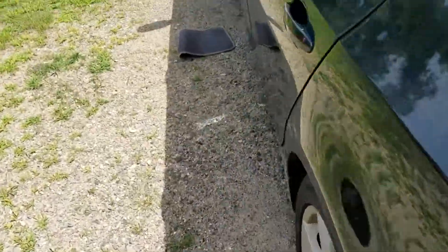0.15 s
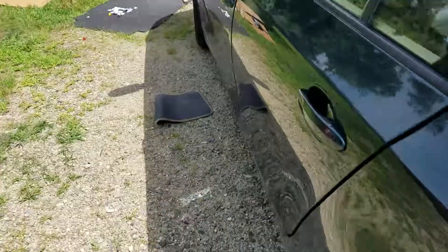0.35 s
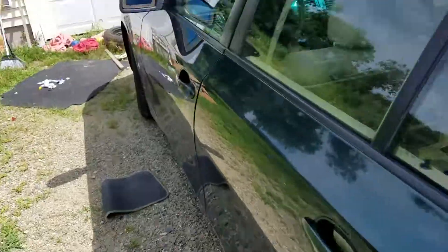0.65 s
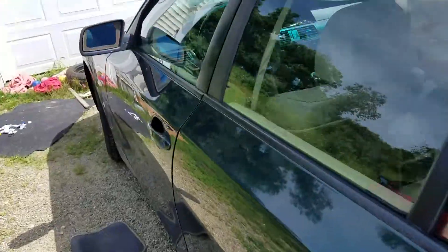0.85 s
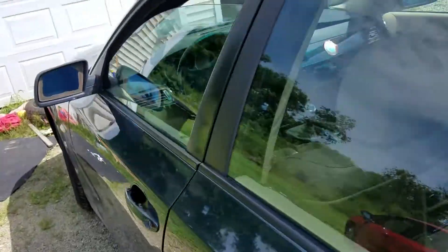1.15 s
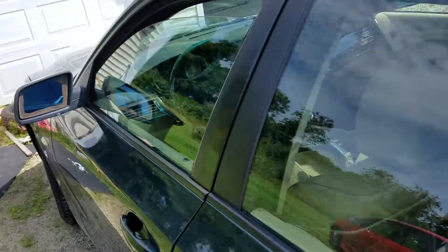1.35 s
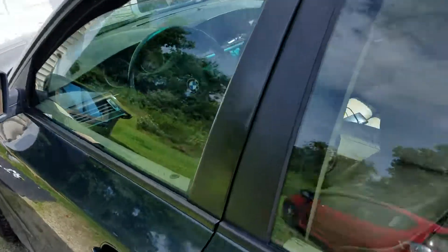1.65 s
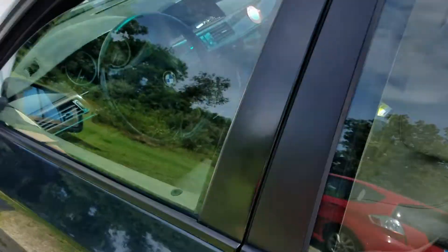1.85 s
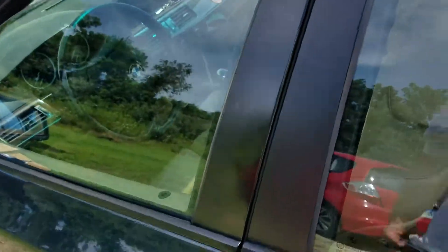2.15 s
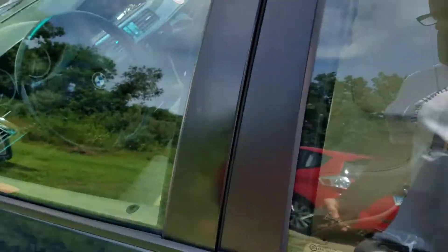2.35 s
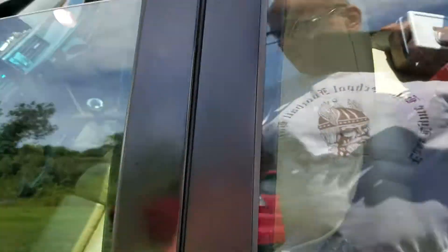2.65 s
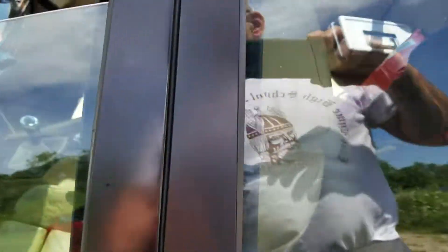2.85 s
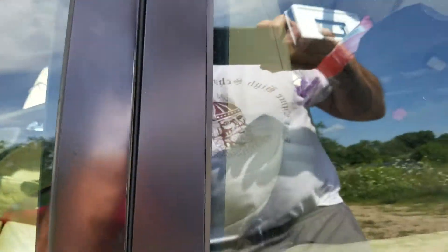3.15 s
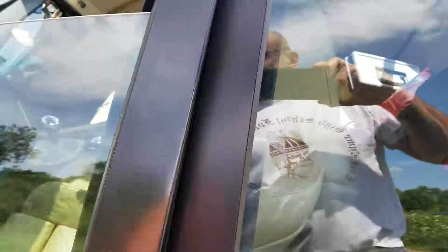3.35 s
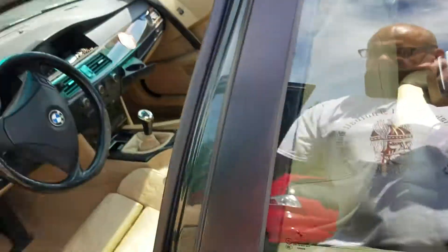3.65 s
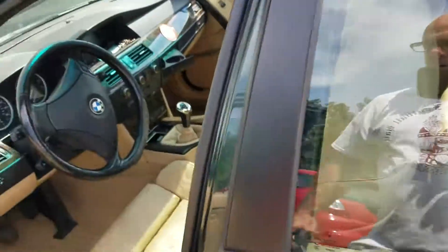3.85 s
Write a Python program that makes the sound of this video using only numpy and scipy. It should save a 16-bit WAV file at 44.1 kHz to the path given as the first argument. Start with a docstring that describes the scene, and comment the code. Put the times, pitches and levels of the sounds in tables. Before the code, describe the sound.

Footsteps crunch unevenly on loose gravel while keys jingle close by, then a car door opens.

```python
"""Footsteps on loose gravel near a parked car: swells of random impacts grind, single damped pulses snap.
Keys jingle close by as impacts exciting high modes, with mode-cluster clinks, squeaks and rubbing cloth.
The handle clunks and the door peels off its seal: band-passed impacts thump, a ringing run of slips rasps.
An insect trills on a pulsed tone and a small bird calls in falling glides over a quiet yard of filtered
noise; a low rumble of noise and wavering tones sinks to a faint hum within the first second."""
import sys
import numpy as np
from scipy import signal
from scipy.fft import rfft, irfft
from scipy.io import wavfile

SR = 44100
rng = np.random.default_rng(int(sys.argv[2]) if len(sys.argv) > 2 else 0)


def pcm_store(signal):
    """Save signal as 16-bit PCM."""
    levels = np.round(np.clip(np.atleast_2d(signal), -1, 1) * 32767)
    wavfile.write(sys.argv[1], SR, levels.astype(np.int16).T)


N = 176400
T = np.arange(N) / SR


def from_db(db):
    """Amplitude gain as the antilogarithm of a level in decibels."""
    return 10 ** (np.asarray(db) / 20)


def rms_one(x):
    """Normalization of mean power: scale to unit rms."""
    return x / np.sqrt(np.mean(x ** 2) + 1e-20)


def panned(db):
    """Interaural level difference: left and right gains, db being left over right."""
    return rms_one(from_db(np.array([[db], [-db]]) / 2))


def lag_at(s):
    """Interaural time difference: left delay in seconds, as sounds come from different sides over time."""
    # arrival lag of the left side behind the right: t/s, lag/s
    lag_curve = [(.25, .00013), (2.3, .00023), (3.2, .0001), (3.6, -.00028)]
    return np.interp(s, *np.transpose(lag_curve))


def coloured(x, points):
    """Minimum-phase (causal) filter with the given spectrum, built from its cepstrum; rms 1."""
    size = 2 ** 18
    hz, db = np.transpose(points)
    bins_hz = np.arange(size // 2 + 1) * SR / size
    gain = from_db(np.interp(np.log(bins_hz + 1), np.log(hz), db))
    cepstrum = irfft(np.log(gain))[:size // 2]
    response = np.exp(2 * rfft(cepstrum, size))
    return rms_one(irfft(rfft(x, size) * response)[..., :N])


def band(x, hz, width):
    """Broad resonance as a band-pass from hz / width to hz * width."""
    width = max(width, 1.05)
    edges = [hz / width, min(hz * width, .45 * SR)]
    return signal.sosfilt(signal.butter(2, edges, "band", fs=SR, output="sos"), x + 1e-18)


def swell(s, rise, fall, db):
    """Exponential growth and decay: 20 dB up over the rise, 20 dB down over the fall."""
    return from_db(db - 20 * np.minimum(np.maximum((s - T) / rise, (T - s) / fall), 10))


def swells(rows):
    """Joint level of several swells by addition of their powers."""
    return np.sqrt(sum(swell(*row) ** 2 for row in rows))


def add(out, s, x):
    """Linear superposition of a short sound at time s."""
    i = max(int(s * SR), 0)
    out[..., i:i + x.shape[-1]] += x[..., :max(N - i, 0)]


def wander(per_s):
    """Random modulation: a slow swing of about one unit between per_s random points a second."""
    return np.interp(T * per_s, np.arange(N), rng.standard_normal(N))


def uneven(per_s, spread_db):
    """Random amplitude modulation, as in stick and slip: a gain moving between random levels; rms 1."""
    levels = np.clip(rng.standard_normal(4000), -1.8, 1.8)
    return rms_one(from_db(spread_db * np.interp(T * per_s, np.arange(4000), levels)))


def contacts(per_s, spread_db):
    """Shot noise: random tiny impacts of uneven size, each with its own interaural lag."""
    lag_spread_s = .00009
    at = np.flatnonzero(rng.random(N) < per_s / SR)
    level_db = spread_db * np.minimum(rng.exponential(1, N), 3.5)
    size = (from_db(level_db) * rng.choice([-1, 1], N))[at]
    lag = ((lag_at(at / SR) + lag_spread_s * rng.standard_normal(N)[at]) * SR).astype(int)
    out = np.zeros((2, N))
    out[0, np.clip(at + lag, 0, N - 1)] = size
    out[1, at] = size
    return out


def grains(per_s, spread_db, low_hz, high_hz, width, count=10):
    """Impact excitation of small bodies of different pitch; roughly flat in spectrum."""
    pitches = np.geomspace(low_hz, high_hz, count)
    return rms_one(sum(band(contacts(per_s / count, spread_db), hz, width) for hz in pitches))


def ringing(x, low_hz, high_hz, t60, ring_db, count=40):
    """Modal response: impacts convolved with the close decaying modes of the body that they strike."""
    t = T[:SR // 8]
    modes = low_hz + (high_hz - low_hz) * (np.arange(count) + rng.random(count))[:, None] / count
    body = np.sin(2 * np.pi * (modes * t + rng.random((count, 1)))).sum(axis=0) * from_db(-60 * t / t60)
    rung = signal.fftconvolve(x, body[None] / np.linalg.norm(body), axes=1)[:, :N]
    return rms_one(x + from_db(ring_db) * rung)


def air(points, alike_hz):
    """Diffuse-field coherence: stereo noise whose sides are alike only in the bass."""
    shared, own = rng.standard_normal(N), rng.standard_normal((2, N))
    low = signal.butter(1, alike_hz, "low", fs=SR)
    high = signal.butter(1, alike_hz, "high", fs=SR)
    return coloured(signal.lfilter(*low, shared) + signal.lfilter(*high, own), points)


def rumble():
    """Low-passed noise plus frequency-modulated tones, sinking together to a faint hum."""
    # spectrum of the noise: f/Hz, relative level per hertz/dB
    rumble_colour = [(20, -35), (55, 10), (120, 1.5), (220, -1.5), (600, -61.5)]
    # course of the gain on noise and tones: t/s, gain/dB
    rumble_course = [(0, -45.5), (.2, -42.5), (.32, -39), (.73, -41), (.8, -51.5), (2.1, -63.5), (4, -59.5)]
    # steady tones: f/Hz, gain before the course/dB
    hum_lines = [(113, -2.5), (152, -6.5), (226, -13)]
    waver_hz = 3
    drone = 0
    for hz, db in hum_lines:
        gain = from_db(db) * uneven(per_s=31, spread_db=2.5)
        cycles = np.cumsum(hz + waver_hz * wander(per_s=25)) / SR
        drone = drone + gain * np.sin(2 * np.pi * cycles)
    noise = air(rumble_colour, alike_hz=88) * from_db(-4.5)
    return (noise + drone) * from_db(np.interp(T, *np.transpose(rumble_course)))


def yard():
    """Broadband ambient noise: open-air hiss, a light breeze and a rumble, with one soft low bump."""
    # spectrum of the hiss: f/Hz, relative level per hertz/dB
    yard_colour = [(25, -7.5), (60, -3.5), (130, 5.5), (450, 3.5), (800, -3), (1400, -3.5), (2200, -1),
                   (3200, -9.5), (5000, -11.5), (7200, -11), (8400, -7.5), (10000, -13.5), (16000, -21.5)]
    hiss_db, breeze_db, breeze_hz, bump_hz = -48.5, -69.5, 42, 115
    hiss = from_db(hiss_db) * air(yard_colour, alike_hz=670)
    breeze = from_db(breeze_db) * rms_one(band(rng.standard_normal((2, N)), breeze_hz, 1.9))
    bump = swell(s=.72, rise=.47, fall=.14, db=-37) * np.sin(2 * np.pi * bump_hz * T)
    return (hiss + rumble() + bump + breeze) * panned(db=-1.5)


def flutter():
    """Narrow-band random modulation: low-passed noise, independent on each side; rms 1."""
    lowpass = signal.butter(2, 190, fs=SR, output="sos")
    return rms_one(signal.sosfilt(lowpass, rng.standard_normal((2, N))))


def insect():
    """Pulsed amplitude and frequency modulation: a trill whose every pulse sags in pitch."""
    mid_hz, sag_hz, pulses_per_s, trill_db = 8250, 303, 19, -58
    cycle = np.cumsum(pulses_per_s * (1 + .15 * wander(per_s=15))) / SR % 1
    tone = np.sin(2 * np.pi * np.cumsum(mid_hz - sag_hz * (cycle - .5)) / SR)
    return from_db(trill_db) * rms_one(tone * (.6 + flutter()) * np.sin(np.pi * cycle))


def bird():
    """Frequency glides: a small bird's falling whistles, each doubled by a fainter second voice just behind."""
    # notes: onset t/s, length/s, start f/Hz, end f/Hz, peak level before flutter/dB
    bird_notes = [(2.735, .04, 4000, 3200, -55), (3.35, .065, 4450, 3900, -59),
                  (3.472, .055, 4000, 2900, -54), (3.69, .045, 3900, 3100, -55),
                  (3.81, .05, 4200, 3000, -53)]
    second_voice_s, second_voice_db = .018, -8
    out = np.zeros(N)
    for s, length, start_hz, end_hz, db in bird_notes:
        u = np.linspace(0, 1, int(length * SR))
        glide = np.sin(2 * np.pi * np.cumsum(start_hz + (end_hz - start_hz) * u) / SR)
        note = from_db(db) * np.sin(np.pi * u) * glide
        add(out, s, note)
        add(out, s + second_voice_s, from_db(second_voice_db) * note)
    return out * (1 + .5 * flutter())


def door():
    """Impact and stick-slip: handle and hinge thump the panel; latch and seal let go in small slips."""
    # latch and rubber seal rasping: peak t/s, rise/s, fall/s, level before panning/dB
    rasp_swells = [(3.018, 0.01, 0.059, -30), (3.143, 0.014, 0.026, -27.5), (3.172, 0.031, 0.082, -22.5),
                   (3.223, 0.014, 0.013, -24.5), (3.255, 0.018, 0.027, -28.5), (3.606, 0.025, 0.044, -26.5)]
    # spectrum of the rasp: f/Hz, relative level per hertz/dB
    seal_colour = [(40, -3), (150, -7), (600, 0.5), (900, -4), (1700, 2), (2350, -4.5), (3100, -14.5),
                   (6000, -19), (16000, -28.5)]
    # the door's body thumping: peak t/s, rise/s, fall/s, level/dB, f/Hz
    thump_rows = [(2.834, 0.023, 0.019, -32, 395), (2.854, 0.028, 0.026, -34, 164),
                  (3.02, 0.0063, 0.03, -28.5, 454), (3.036, 0.022, 0.073, -38, 197),
                  (3.173, 0.012, 0.041, -20, 297), (3.262, 0.0087, 0.04, -28.5, 510),
                  (3.607, 0.035, 0.052, -27, 440), (3.613, 0.019, 0.087, -30.5, 163),
                  (3.915, 0.011, 0.046, -38, 340)]
    slips = contacts(per_s=2800, spread_db=3.5)
    rasp = ringing(slips, low_hz=297, high_hz=2540, t60=0.032, ring_db=-16.5, count=12)
    out = coloured(rasp, seal_colour) * swells(rasp_swells) * panned(db=-4.5)
    for s, rise, fall, db, hz in thump_rows:
        level = swell(s, rise, fall, db)
        thump = band(contacts(per_s=2100, spread_db=3.0), hz, 1.42) * level
        out += rms_one(thump) * np.sqrt(np.mean(level ** 2))
    return out


def cloth():
    """Friction as shot noise: cloth rustles as a hand rummages for the keys."""
    # rummaging: peak t/s, rise/s, fall/s, level before panning/dB
    rummage_swells = [(1.23, 0.012, 0.14, -30.5), (1.275, 0.036, 0.047, -34.5), (1.992, 0.03, 0.06, -27.5),
                      (2.396, 0.0086, 0.022, -29), (2.47, 0.11, 0.041, -36)]
    # spectrum of the cloth: f/Hz, relative level per hertz/dB
    cloth_colour = [(100, -29), (230, -28), (340, 1.5), (440, 1.5), (700, -3), (1000, -9.5), (2000, -6.5),
                    (5000, -31.5)]
    rustle = coloured(contacts(per_s=1100, spread_db=4), cloth_colour)
    return rustle * swells(rummage_swells) * panned(db=-0.5)


def squeaks():
    """Phase diffusion broadens a line: a rubbed key squeaks on one of its modes."""
    # squeaks: peak t/s, rise/s, fall/s, level before panning/dB, f/Hz
    squeak_rows = [(0.924, .006, 0.022, -26, 10000), (1.33, 0.0064, 0.011, -26.5, 10250),
                   (2.412, 0.02, 0.019, -24.5, 12750), (2.41, 0.032, 0.13, -29.5, 8740),
                   (2.42, 0.038, 0.05, -32, 7350), (2.42, 0.036, 0.028, -36.5, 7430),
                   (2.552, .02, .022, -26, 14800), (2.588, .02, 0.037, -25, 15300)]
    width_hz = 55
    out = np.zeros((2, N))
    for s, rise, fall, db, hz in squeak_rows:
        steps = rng.standard_normal((2, N))
        phase = np.cumsum(steps, axis=1) * np.sqrt(2 * np.pi * width_hz / SR)
        out += np.sqrt(2) * swell(s, rise, fall, db) * np.sin(2 * np.pi * hz * T + phase)
    return out


def keys():
    """Modal excitation by sliding contact: the keys slide, catch on their teeth and squeak."""
    # keys sliding over each other: peak t/s, rise/s, fall/s, level before panning/dB
    jingle_swells = [(.26, .08, 0.16, -39), (.84, 0.02, 0.025, -37), (.945, 0.019, 0.018, -30.5),
                     (1.287, 0.16, 0.047, -31.5), (1.42, 0.2, 0.28, -37), (1.56, 0.057, 0.064, -34),
                     (1.8, 0.045, 0.29, -39.5), (1.98, 0.086, 0.1, -32.5), (2.15, 0.059, 0.18, -36.5),
                     (2.255, 0.055, 0.046, -32), (2.41, 0.062, 0.16, -38), (2.505, 0.023, 0.024, -24),
                     (2.557, 0.062, 0.042, -26), (2.587, 0.024, 0.078, -28.5), (2.68, 0.037, 0.062, -37.5),
                     (3.05, 0.081, 0.2, -44), (3.76, 0.36, 0.2, -46)]
    # spectrum of the sliding: f/Hz, relative level per hertz/dB
    key_colour = [(1000, -35), (3000, -12), (4500, -8.5), (6200, -12.5), (7400, -11), (8700, 3),
                  (10000, -6), (12600, -4.5), (13600, -9.5), (15200, -5), (16500, -33)]
    # key teeth catching on each other: peak t/s, rise/s, fall/s, level before panning/dB
    scrape_swells = [(2.5, .035, 0.035, -40), (2.555, .035, 0.12, -38)]
    slide = ringing(contacts(per_s=5000, spread_db=3.5), low_hz=5570, high_hz=15500, t60=0.068, ring_db=-32.0)
    jingle = coloured(slide, key_colour) * swells(jingle_swells) * uneven(per_s=210, spread_db=5.5)
    catches = band(contacts(per_s=700, spread_db=4.5), hz=5300, width=2.1)
    teeth = rms_one(catches) * swells(scrape_swells)
    return (jingle + squeaks() + teeth) * panned(db=-2.0)


def clinks(count=60):
    """Damped modal cluster: metal scrapes into metal, mostly damped at once by the hand."""
    # sharp clinks: t before the delay/s, level before level_db/dB, f of the strongest modes/Hz,
    # left over right/dB
    clink_rows = [(0.0835, -27, 6500, -8), (0.2582, -20, 6100, -3), (0.9064, -9, 9100, -1),
                  (0.9195, -16, 9700, 9), (1.276, -19, 8700, -5), (1.299, -15.5, 6300, -3),
                  (1.3623, -21, 9100, -2), (1.478, -20, 8500, -3), (1.554, -17.5, 12100, -1),
                  (1.763, -22, 10900, -2), (1.8336, -21, 7550, -6), (1.962, -18, 9300, -2),
                  (2.0307, -20.5, 8400, 1), (2.0986, -20, 10300, -3), (2.3273, -22, 8250, -5),
                  (2.3573, -18.5, 9500, -2), (2.3877, -22.5, 12300, -3), (2.471, -18, 8800, -1),
                  (2.489, -16, 12100, -2), (2.5045, -28, 13500, -1.5), (2.5384, -15, 14600, 8),
                  (2.559, -16, 8790, -3), (2.579, -12, 13000, 0), (2.6452, -19, 11700, -4),
                  (2.6587, -20, 15000, -0.5), (2.6678, -10.5, 12800, -4.0), (2.678, -28, 12000, -2),
                  (2.86, -25, 12300, -3), (3.014, -15, 8600, 2), (3.034, -26, 14000, -3),
                  (3.6013, -25, 8400, 1), (3.6302, -23, 7030, 2), (3.7647, -24.5, 7300, 2)]
    delay_s, lead_s, rise_s, level_db = .0022, .006, .002, -8.5
    t60_s, ring_db, ring_s, octaves = .016, -12.5, .077, .43
    tick_db, tick_hz = -12, 2400  # the dull contact under each clink
    out, t = np.zeros((2, N)), T[:SR // 12]
    before, after = np.maximum(lead_s - t, 0), np.maximum(t - lead_s, 0)
    # a fast decay followed by a fainter, longer one
    decay = from_db(-60 * after / t60_s) + from_db(ring_db - 60 * after / ring_s)
    envelope = decay * from_db(-20 * before / rise_s)
    for s, db, hz, pan_db in clink_rows:
        modes = rng.uniform(1800, 16500, (count, 1))
        weight = 1 / (1 + (np.log2(modes / hz) / octaves) ** 2)
        phases = rng.random((2, count, 1))
        ring = rms_one(np.sum(weight * np.sin(2 * np.pi * (modes * t + phases)), axis=1))
        tick = rms_one(band(rng.standard_normal((2, len(t))), tick_hz, 2.4))
        tick = tick * from_db(tick_db - 60 * after / t60_s)
        sound = (ring + tick) * envelope * from_db(db + level_db) * panned(pan_db)
        add(out, s + delay_s - lead_s, sound)
    return out


def snaps():
    """Impulse response of a heavily damped body: a dead pulse of a cycle or two, then a faint settling."""
    # single stones snapping and dull knocks: t before the delay/s,
    # pulse peak before level_db and panning/dB, f/Hz, left over right/dB
    snap_rows = [(0.07, -24.5, 1500, -12), (0.13, -29, 1050, -8), (0.179, -29.5, 1430, -18),
                 (0.226, -11.5, 1850, -25), (0.254, -24, 344, 1), (0.259, -17, 1210, -3),
                 (0.276, -21, 1000, -2), (0.341, -17.5, 1900, -28), (.407, -31, 1260, 1),
                 (0.43, -26.5, 1300, 0), (0.594, -26.5, 1520, -5), (0.625, -27, 1480, -5),
                 (0.631, -36, 1920, -6), (.749, -29, 1840, -7), (0.949, -23, 1460, -7),
                 (0.98, -26, 1020, -2), (1.225, -36.5, 905, -2), (1.28, -29, 603, -1),
                 (1.294, -23, 590, -2), (1.399, -19.5, 960, -4.5), (1.556, -23, 1390, 5),
                 (1.626, -19, 1260, -4.0), (1.839, -20, 2040, -6), (1.989, -20.5, 486, 1),
                 (2.117, -21.5, 650, 0), (2.171, -10.5, 580, -2), (2.277, -27, 2200, -5),
                 (2.393, -30, 420, 0), (2.488, -29.5, 486, 4), (2.538, -19.5, 2090, -1),
                 (2.554, -22.5, 597, 1.5), (2.764, -30.5, 670, -2), (2.908, -32.5, 2000, -12),
                 (2.986, -22, 2420, -10), (3.014, -26.5, 480, 2), (3.075, -29, 470, 0),
                 (3.2, -16, 1700, -6), (3.25, -35, 590, -2), (3.531, -26, 1460, -10),
                 (3.812, -24, 2100, -14)]
    delay_s, width, level_db, settle_db, settle_s = .001, 1.436, 3, -16.5, .066
    out, t = np.zeros((2, N)), T[:SR // 10]
    passband = signal.butter(4, [166, 3400], "band", fs=SR, output="sos")
    for s, db, hz, pan_db in snap_rows:
        pulse = signal.sosfilt(passband, band(1.0 * (t == 0), hz, width))
        settle = rms_one(band(rng.standard_normal((2, len(t))), hz * 1.015, 1.425))
        settle = settle * from_db(settle_db - 60 * t / settle_s)
        sound = (pulse / np.abs(pulse).max() + settle) * from_db(db + level_db) * panned(pan_db)
        add(out[0], s + delay_s + lag_at(s), sound[0])
        add(out[1], s + delay_s, sound[1])
    return out


def gravel():
    """Granular impact noise: stones grind under each shoe, and grit ticks between the steps."""
    # shoes pressing into gravel: peak t/s, rise/s, fall/s, level before panning/dB
    step_swells = [(.075, 0.25, 0.2, -44), (.265, 0.15, 0.12, -27.5), (.84, 0.094, 0.05, -34),
                   (.9, 0.11, 0.26, -36.5), (1.235, 0.14, 0.074, -36), (1.285, 0.049, 0.039, -31.5),
                   (1.44, 0.31, 0.067, -37), (1.56, 0.018, 0.018, -28.5), (1.645, 0.23, 0.17, -32),
                   (1.985, 0.1, 0.1, -31), (2.15, 0.12, 0.11, -31), (2.245, 0.051, 0.065, -37),
                   (2.47, 0.045, 0.25, -32), (3.76, 0.81, 0.079, -41)]
    # spectrum of the stones: f/Hz, relative level per hertz/dB
    gravel_colour = [(100, -28), (300, -9.5), (600, -10.5), (1000, -12), (1500, -6.5), (2300, -7.5),
                     (3200, -16.5), (4800, -24.5), (6300, -14.5), (8000, -31.5), (12000, -21), (16000, -71)]
    # grit under a sole as the weight shifts: peak t/s, rise/s, fall/s, level before panning/dB
    shift_swells = [(.41, 0.27, 0.21, -49), (.62, 0.7, 0.2, -51.5), (3.365, 0.034, 0.13, -38.5),
                    (3.415, 0.085, 0.055, -41), (3.5, 0.074, 0.13, -42)]
    # spectral shaping of the grit: f/Hz, relative gain/dB
    grit_colour = [(200, -20), (600, 0), (1600, 9), (2400, 5), (3300, 7), (8000, -21)]
    stones = grains(per_s=1500, spread_db=2.5, low_hz=308, high_hz=11700, width=1.68)
    stones = ringing(stones, low_hz=482, high_hz=2760, t60=0.017, ring_db=-11.5, count=14)
    grinding = coloured(stones, gravel_colour) * swells(step_swells) * uneven(per_s=200, spread_db=2.5)
    grit = grains(per_s=870, spread_db=7.5, low_hz=630, high_hz=2390, width=1.2)
    ticking = coloured(grit, grit_colour) * swells(shift_swells)
    return (grinding + ticking) * panned(db=-6.0)


def scene():
    """Linear superposition of all sources in the open air."""
    return yard() + insect() + bird() + door() + cloth() + keys() + clinks() + snaps() + gravel()


def record(dry):
    """Band limitation: a steep elliptic low-pass cuts the top above 16 kHz."""
    return signal.sosfilt(signal.ellip(10, .1, 80, 16000, fs=SR, output="sos"), dry)


dry = scene()
out = record(dry)
pcm_store(out)
```